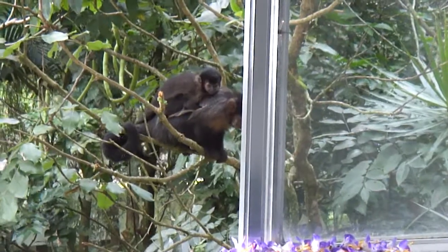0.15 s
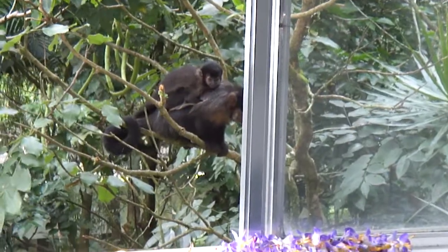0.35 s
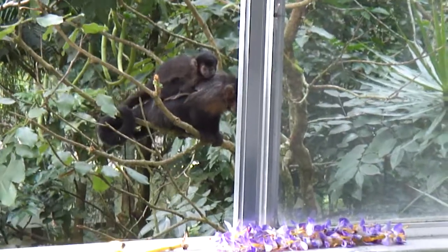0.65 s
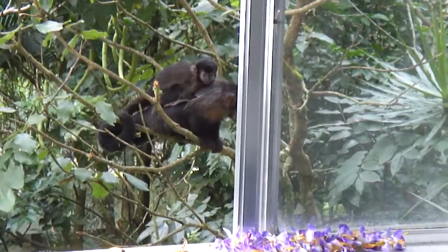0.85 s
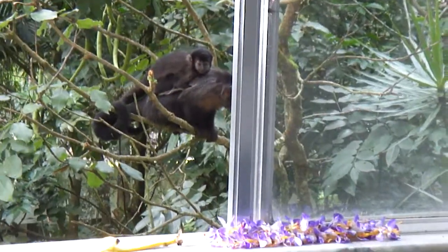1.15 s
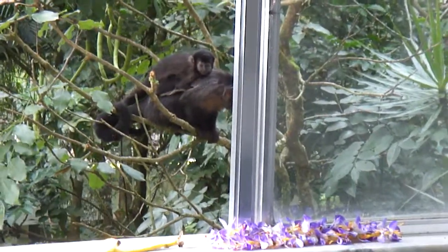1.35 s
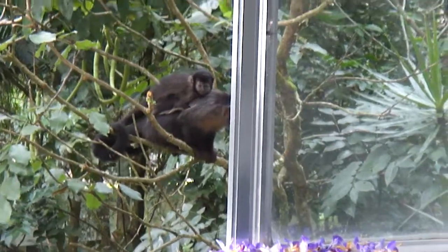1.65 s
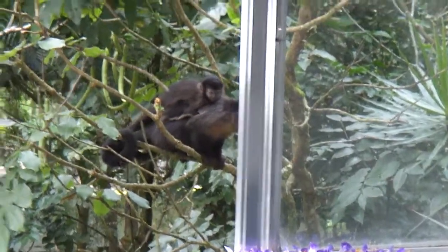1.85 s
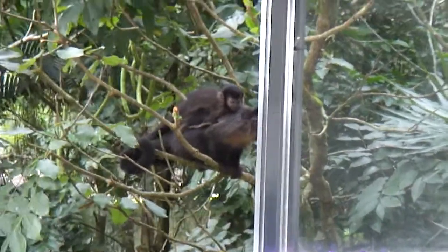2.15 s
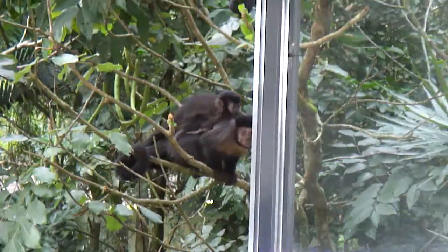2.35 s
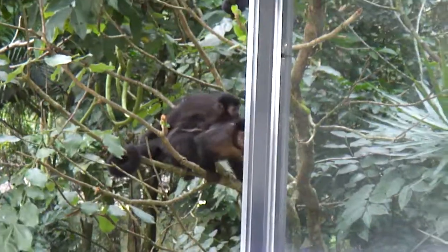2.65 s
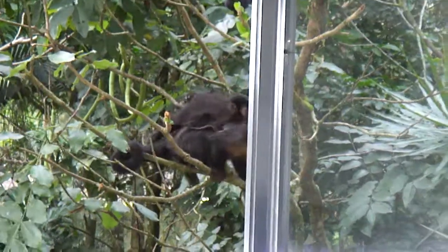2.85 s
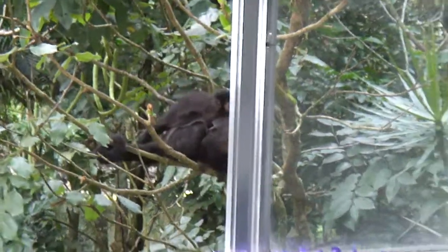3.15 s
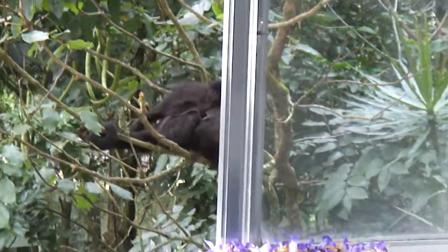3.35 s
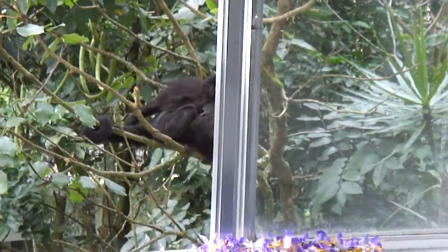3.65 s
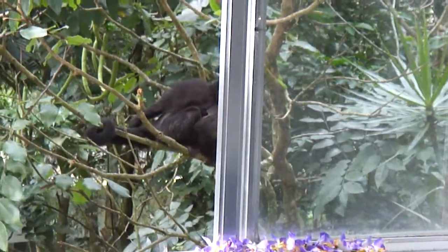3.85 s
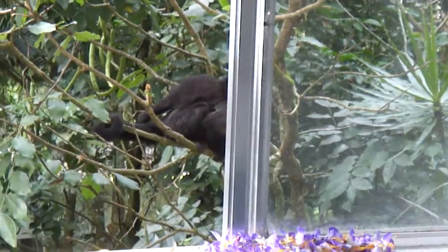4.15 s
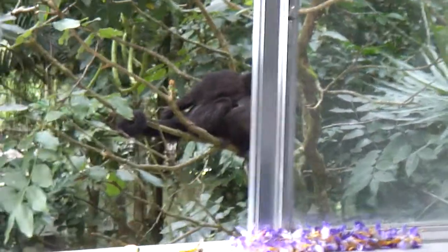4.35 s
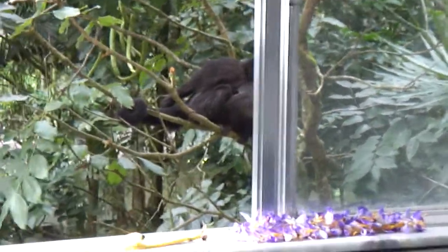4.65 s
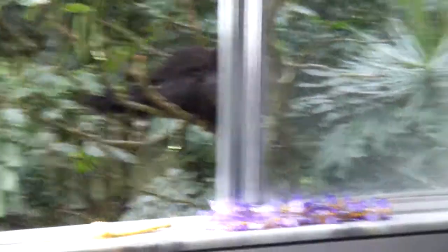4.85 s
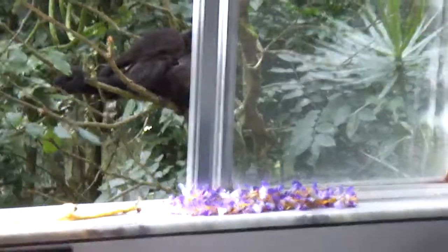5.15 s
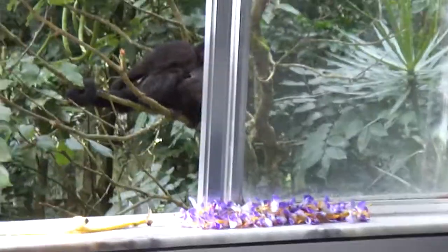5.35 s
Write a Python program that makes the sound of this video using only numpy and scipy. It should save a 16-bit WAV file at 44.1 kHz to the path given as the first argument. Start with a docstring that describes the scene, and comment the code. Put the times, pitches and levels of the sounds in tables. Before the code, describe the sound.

A broad, even outdoor hiss, soft and weighted to the low mids with dulled treble, holds steady for the whole five and a half seconds. For the first second it is alone. A barely audible chirp comes at 1.2 s, a clearer one at 1.4, then faint paired yips around 1.7 and a stronger rising yip at 2.15. At 2.45 a double chirp snaps out, its second part the loudest and sharpest call. From 2.8 to 3.1 a rapid run of chirps steps down in pitch and weakens. Another close pair comes at 3.35, a bright falling chirp at 3.75, weak calls around 3.9, and a yip at 4.2. After a gap, a faint yip at 4.9 and a last falling chirp at 5.2. All are tiny, high, slightly raspy monkey calls, with quick muffled echoes from house and trees, heard in mono.

```python
"""Just outside a house window, a capuchin monkey on a branch gives a quick string of short, high calls.
Chirps swell on a nearly level pitch and drop as they stop; yips start abruptly and rise.
Each call is a stack of six harmonics plus breathy rasp; the mouth picks out one overtone.
The house front and the trees throw the calls back as dulled echoes and a short noise tail.
Underneath lies a steady outdoor hiss, made of noise shaped by frequency."""
import sys
import numpy as np
from scipy import signal
from scipy.fft import rfft, irfft
from scipy.io import wavfile
from scipy.ndimage import uniform_filter1d

SR = 44100
rng = np.random.default_rng(int(sys.argv[2]) if len(sys.argv) > 2 else 0)


def output_pcm(signal):
    """Save a mono or channel-first signal as 16-bit PCM at the path in sys.argv[1].

    Samples are clipped to [-1, 1] before scaling.
    """
    pcm = np.clip(np.atleast_2d(signal).T, -1, 1) * 32767
    wavfile.write(sys.argv[1], SR, np.round(pcm).astype(np.int16))


N = 242991  # length of the scene in samples

# Falling chirps from the branch: (start [s], length [s], pitch [Hz], final drop [share of the pitch],
# level [dB], strongest overtone [dB re the fundamental], mouth resonance [Hz])
CHIRP_CALLS = [ (1.210, 0.026, 1571, .06, -61, 13, 2900), (1.410, 0.033, 1342, .19, -34.5, -14, 3750),
               (2.445, .021, 1766, .01, -36, -7, 3000), (2.474, 0.0095, 1705, .15, -21.5, -14, 4250),
               (2.805, .031, 1574, .08, -26.5, -16, 2700), (2.903, 0.0071, 1500, 0.24, -30.5, -4.5, 2800),
               (2.9105, .0115, 1347, .19, -32.5, -3, 3100), (2.972, .034, 1173, .06, -42.5, -1.5, 2900),
               (3.049, 0.021, 1016, .07, -47.5, 4, 2550), (3.102, .035, 929, .06, -41, 1, 2700),
               (3.331, .035, 1432, .04, -31.5, -6, 2750), (3.362, .027, 1372, .09, -35, -.5, 2750),
               (3.747, 0.029, 1610, .20, -28.5, -11.5, 3850), (3.898, .038, 1331, 0.057, -51, 4.5, 2900),
               (5.183, .039, 1532, .20, -35.5, -7.5, 3500), ]


def chirps():
    """Each chirp swells up to a late crest, then its pitch drops away as the voice stops."""
    drop_s, earliest_crest = .008, .5  # length of the final drop; earliest crest as share of the length
    overshoot = .061  # how far above its pitch an unsettled voice opens, as share of the pitch
    skirts_db = (22, 49)  # sharp resonance: loss below and above it, dB per octave
    out = np.zeros(N)
    for start, length, hz, drop, level_db, overtone_db, mouth_hz in CHIRP_CALLS:
        rough = roughness(length)
        crest = max(1 - drop_s / length, earliest_crest)
        start_hz = hz * (1 + overshoot * rough)
        end_hz = hz * (1 - drop)
        mouth = (overtone_db, mouth_hz, skirts_db)
        add(out, start, call(length, crest, start_hz, hz, end_hz, level_db, 13, rough, mouth))
    return out


# Rising yips from the same branch: (start [s], length [s], pitch [Hz], level [dB],
# strongest overtone [dB re the fundamental], mouth resonance [Hz])
YIP_CALLS = [ (1.683, .015, 1740, -60.5, 16.5, 3500), (1.720, .021, 1250, -42.5, -7, 3700),
             (1.744, 0.024, 1248, -45, -15, 3400), (2.154, .0235, 1223, -31, -3.5, 3780),
             (3.952, .010, 1660, -49.5, 6.5, 3250), (4.1822, .0235, 1134, -35.5, .5, 3900),
             (4.927, .012, 1585, -43, -5, 3200), (4.933, .015, 1305, -58, 11, 2600), ]


def yips():
    """Each yip starts abruptly, climbs to its pitch and holds it."""
    crest, opening = .65, .915  # crest as share of the length; opening pitch as share of the crest pitch
    skirts_db = (15, 36)  # gentle resonance: loss below and above it, dB per octave
    out = np.zeros(N)
    for start, length, hz, level_db, overtone_db, mouth_hz in YIP_CALLS:
        mouth = (overtone_db, mouth_hz, skirts_db)
        yip = call(length, crest, hz * opening, hz, hz, level_db, 3, roughness(length), mouth,
                   fade_db=5.5, rolloff_db=14, rasp_db=-9)
        add(out, start, yip)
    return out


def call(length, crest, start_hz, crest_hz, end_hz, level_db, swell_db, rough, mouth,
         shimmer_db=4, fade_db=7, edge_s=.0012, rolloff_db=16, bend=1.28, rasp_db=-14):
    """Pressure builds to a crest, then the pitch bends to its end value and the voice fades and breaks off."""
    t = np.arange(int(length * SR)) / SR
    crest_s = np.clip(crest, .1, .9) * length
    build = np.minimum(t / crest_s, 1)
    release = np.maximum((t - crest_s) / (length - crest_s), 0) ** bend
    # the folds beat less evenly as they slacken
    unrest = rough + .25 * release

    pitch = start_hz + (crest_hz - start_hz) * build + (end_hz - crest_hz) * release
    jitter = .035 * unrest * walk(1160, len(t))  # share of the pitch
    phase = 2 * np.pi * np.cumsum(pitch * (1 + jitter)) / SR

    shimmer = shimmer_db * unrest * walk(900, len(t))
    effort = undb(level_db - swell_db * (1 - build) - fade_db * release + shimmer)
    edges = np.clip(np.minimum(t, length - t) / edge_s, 0, 1)
    gate = np.sin(np.pi / 2 * edges) ** 2

    overtones_db = overtones(pitch, crest_hz, *mouth)
    # above the fourth, the harmonics die away quickly
    top_db = overtones_db[-1] - rolloff_db
    harmonics_db = [0, *overtones_db, top_db, top_db - 3]
    voice = 0
    for k, db in enumerate(harmonics_db, 1):
        flutter_db = walk(160, len(t))
        voice = voice + undb(db + flutter_db) * np.sin(k * phase)
    breath = undb(rasp_db) * unrest * rasp(phase)
    return (voice + breath) * effort * gate


def roughness(length):
    """The share of a call in which the folds have not yet settled: the shorter the call, the rougher."""
    settle_s = .0046
    return min(settle_s / length, 1)


def overtones(pitch, crest_hz, strongest_db, mouth_hz, skirts_db):
    """Levels of harmonics 2 to 4: each brightens as the pitch carries it toward the mouth resonance."""
    below_db, above_db = skirts_db

    def loss_db(hz):
        """How much the mouth weakens each harmonic of this pitch."""
        octaves = np.log2(np.outer(np.arange(2, 5), hz) / mouth_hz)
        return np.maximum(-octaves * below_db, octaves * above_db)

    # at the crest pitch, the least weakened harmonic has the strongest level
    return strongest_db + loss_db(crest_hz).min() - loss_db(pitch)


def rasp(phase):
    """Turbulence let through once each cycle of the folds, confined by the throat."""
    throat = signal.butter(4, [1600, 4800], "bandpass", fs=SR, output="sos")
    puffs = rng.standard_normal(len(phase)) * (1 + np.sin(phase))
    air = signal.sosfilt(throat, puffs)
    return air / np.std(air)


# Returns from the house front, the window and the trees, before dulling:
# (delay [s], level [dB re the direct call])
ECHO_PATHS = [(.0066, -5), (0.0139, -6.5), (0.0176, -9), (0.0311, -10), (.045, -18.5), (.062, -12.5),
              (.097, -17), (.16, -29)]


def garden(x, wall_hz=3500, leaves_hz=5000, first_s=.01):
    """The direct call, a few dulled echoes, and a short scatter from trunks and leaves."""
    echoes = np.zeros(N)
    for delay, db in ECHO_PATHS:
        echoes += undb(db) * np.pad(x, (int(delay * SR), 0))[:N]

    t = np.arange(SR) / SR
    scatter_t60_s = .46  # time for the scatter to fall by 60 dB
    decay = np.exp(-np.log(1000) * t / scatter_t60_s)
    tail = rng.standard_normal(SR) * decay * (t > first_s)
    scatter = undb(-9.5) * signal.fftconvolve(x, tail / np.linalg.norm(tail))[:N]
    return x + lowpass(echoes, wall_hz) + lowpass(scatter, leaves_hz)


# Spectrum of the outdoor hiss at the microphone, shape only: (frequency [Hz], relative density [dB])
HISS_SPECTRUM = [(15, -61), (25, -31), (66, -17.5), (106, -9.5), (163, -7), (195, -4.5), (245, -3.5),
                 (429, -2), (788, -3), (851, -1), (966, -3.5), (1310, -3.5), (1690, -5.5), (4900, -14.5),
                 (10800, -31), (14000, -59), (22000, -120)]


def hiss(level_db=-47, sway_db=.36):
    """An even, broad outdoor hiss that barely sways: noise shaped by frequency."""
    hz, db = np.transpose(HISS_SPECTRUM)
    bins_hz = np.maximum(np.fft.rfftfreq(N, 1 / SR), 1)
    shape = undb(np.interp(np.log(bins_hz), np.log(hz), db))
    noise = irfft(rfft(rng.standard_normal(N)) * shape, N)
    return noise / np.std(noise) * undb(level_db + sway_db * walk(2.38, N))


def undb(db):
    """Decibels to gain."""
    return 10 ** (np.asarray(db) / 20)


def walk(rate, size):
    """A smooth random wander with about `rate` turns a second and a spread near 1."""
    hold = max(int(SR / rate), 1)
    steps = np.repeat(rng.standard_normal(size // hold + 1), hold)
    smooth = uniform_filter1d(uniform_filter1d(steps, hold), hold)
    return .82 * smooth[:size]


def lowpass(x, hz):
    """A gentle loss of treble."""
    return signal.sosfilt(signal.butter(1, min(hz, .45 * SR), fs=SR, output="sos"), x)


def add(out, start, sound):
    """Mix a call in at its moment [s]."""
    i = int(start * SR)
    out[i:i + len(sound)] += sound[:N - i]


def scene():
    """The monkey's chirps and yips in the garden, over the hiss, on one channel."""
    monkey = chirps() + yips()
    return np.array([garden(monkey) + hiss()])


def record(dry):
    """The camera's microphone channel cuts the top octave with a steep low-pass."""
    top_hz = 10900
    return signal.sosfilt(signal.ellip(12, .1, 70, top_hz, fs=SR, output="sos"), dry)


dry = scene()
out = record(dry)
output_pcm(out)
```